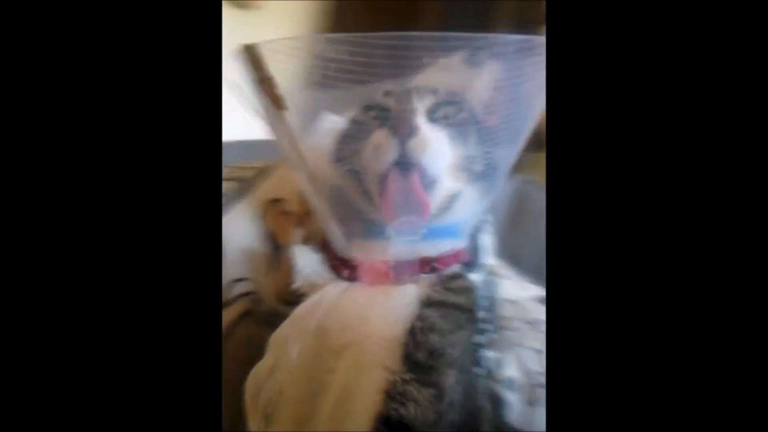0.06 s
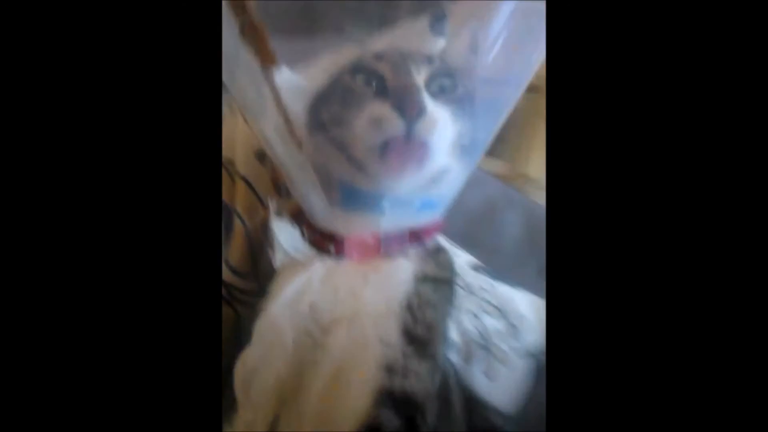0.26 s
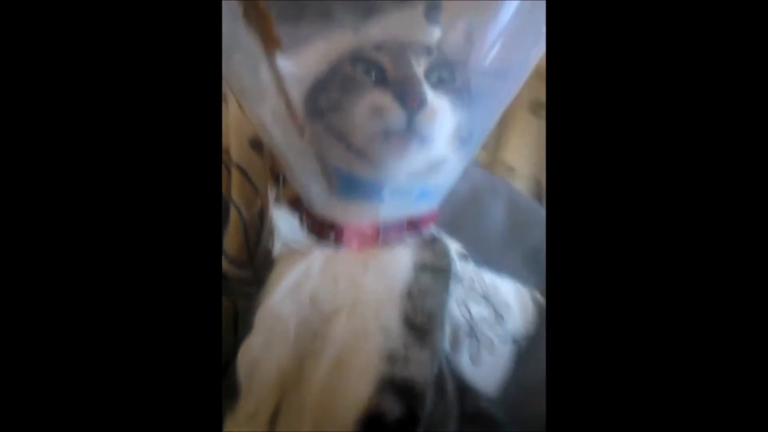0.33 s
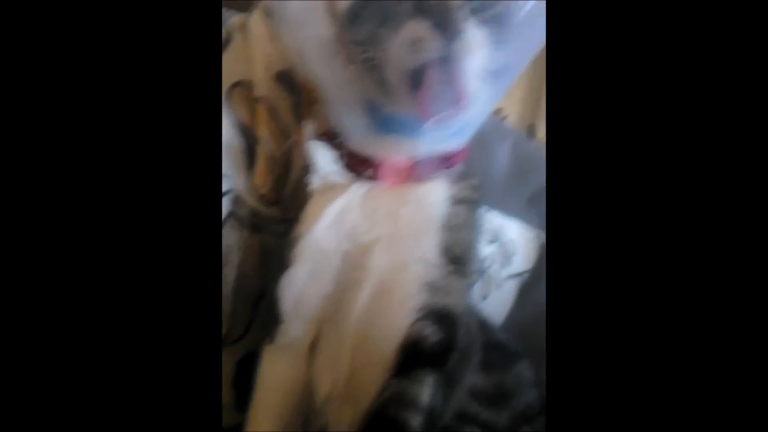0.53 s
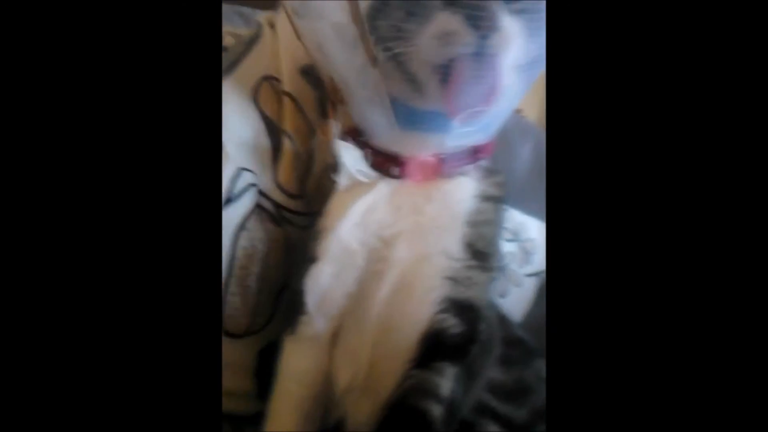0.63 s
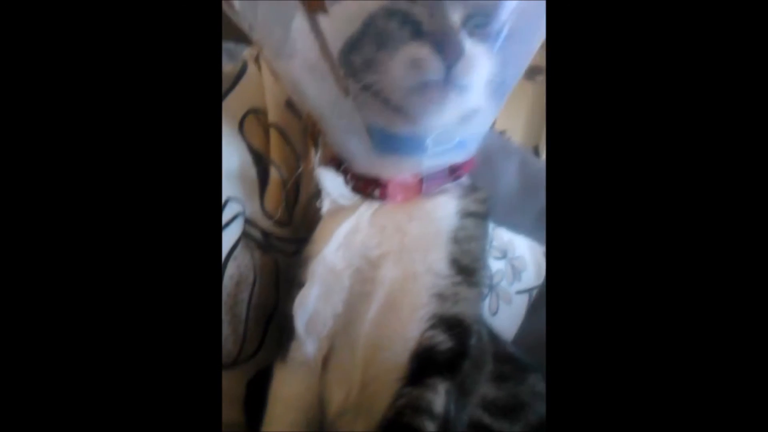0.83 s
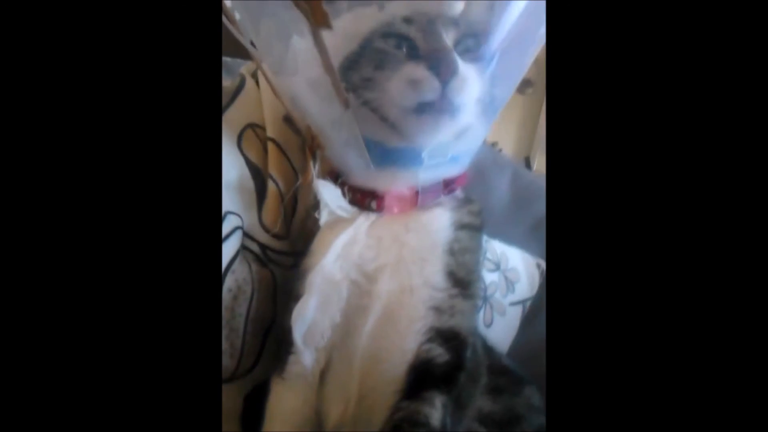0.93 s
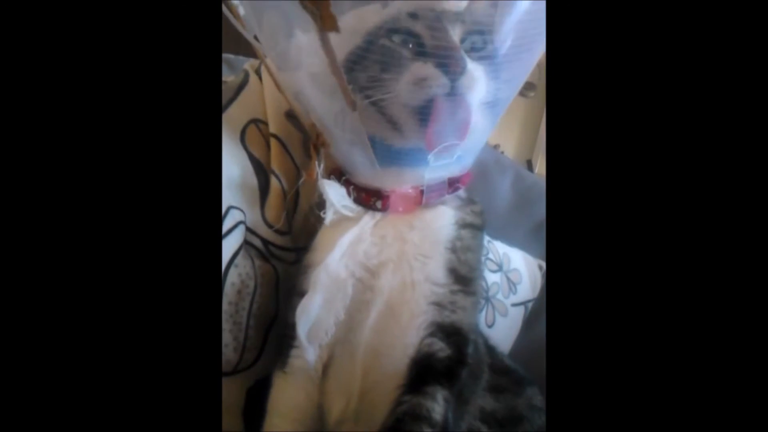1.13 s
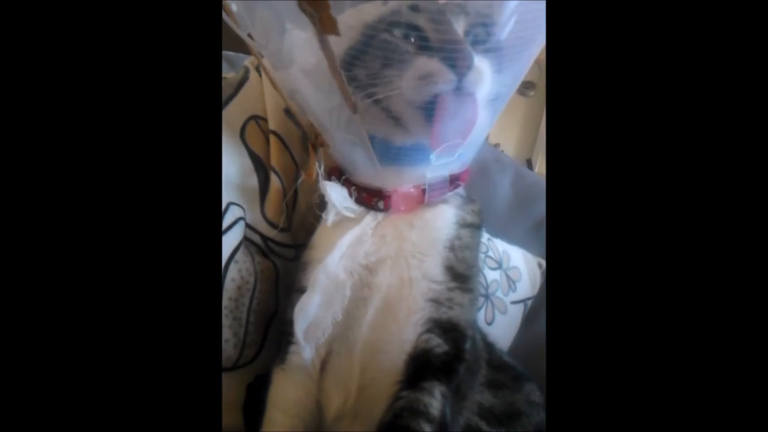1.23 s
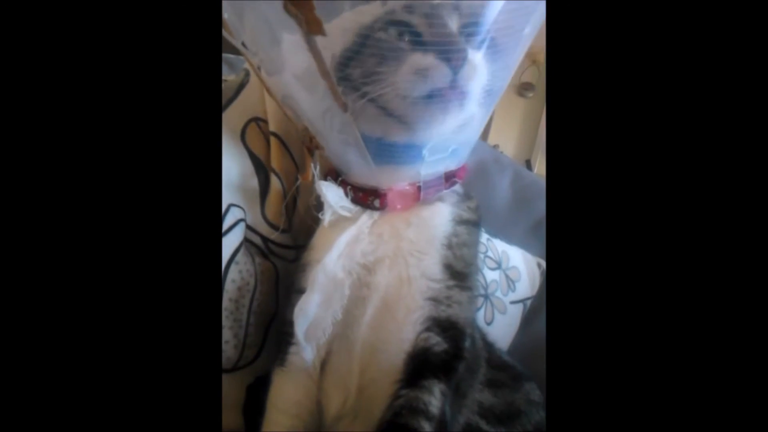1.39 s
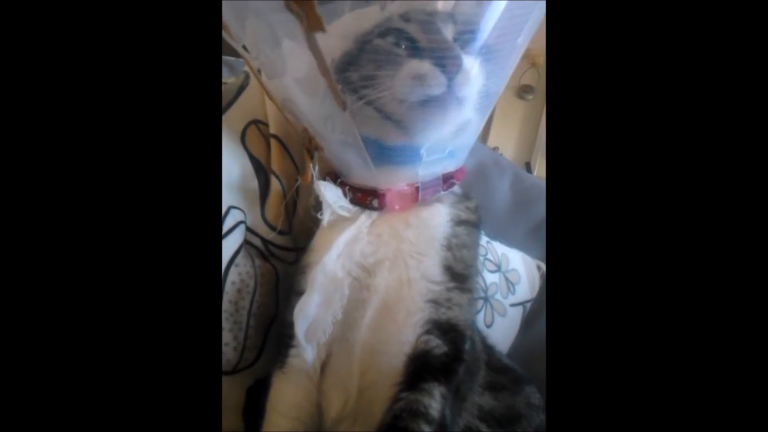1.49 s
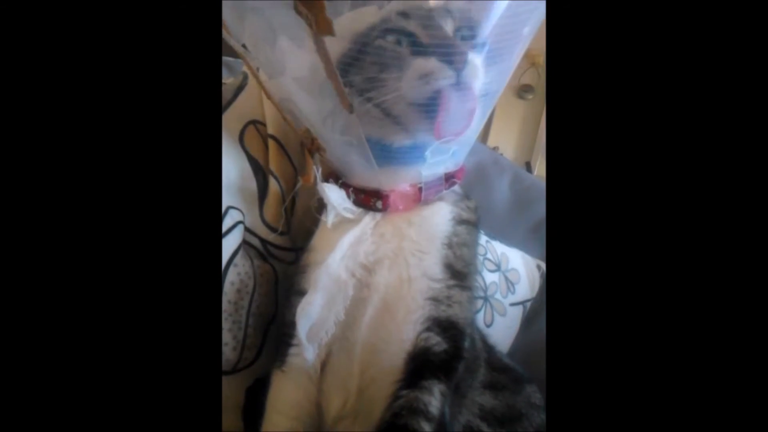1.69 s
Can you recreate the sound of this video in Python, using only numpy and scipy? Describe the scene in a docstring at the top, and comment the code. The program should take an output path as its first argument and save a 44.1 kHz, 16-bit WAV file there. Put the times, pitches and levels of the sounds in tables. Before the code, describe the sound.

A cat's rough tongue scrapes the inside of a plastic recovery cone three times. Each short rasp starts with small wet taps, and fur rustles faintly in between. The microphone is close, in a quiet small room.

```python
"""A quiet small room, one microphone close to a cat in a plastic recovery cone.
Room tone and a faint rustle of fur come first. At 0.2 s the tongue lands inside the cone with wet taps
and the sheet flexes; barbs catch and slip in a rasp that swells, turns briefly tonal and fades.
The cone rings briefly. Two more licks follow near 0.7 s and 1.3 s, with fur rustling in between
and once more at the end."""
import sys
import numpy as np
from scipy import signal
from scipy.fft import rfft, irfft
from scipy.io import wavfile

SR = 44100
rng = np.random.default_rng(int(sys.argv[2]) if len(sys.argv) > 2 else 0)


def file_out(sig):
    """Save sig as 16-bit WAV at sys.argv[1]."""
    # one column per channel
    cols = np.atleast_2d(sig).T
    # limit, then scale
    lim = np.clip(cols, -1, 1)
    pcm = np.round(lim * 32767).astype(np.int16)
    wavfile.write(sys.argv[1], SR, pcm)


N = 77175
TIME = np.arange(N) / SR


def amp(db):
    """Decibels to gain."""
    return 10 ** (np.asarray(db) / 20)


def unit(x):
    """Scales to rms 1."""
    return x / np.sqrt(np.mean(x ** 2) + 1e-20)


def bell(at, half_width_s):
    """A smooth rise and fall around a moment."""
    return np.exp(-((TIME - at) / half_width_s) ** 2)


def colour(x, points):
    """Minimum-phase filter through (frequency [Hz], level [dB]) points."""
    hz, db = np.transpose(points)
    f = abs(np.fft.fftfreq(4096, 1 / SR))
    log_gain = np.log(amp(np.interp(np.log(f + 1), np.log(hz + 1), db)))
    kernel = np.fft.ifft(np.exp(np.conj(signal.hilbert(log_gain)))).real
    return signal.fftconvolve(x, kernel[:len(f) // 2])[:N]


def cut(x, hz, kind):
    """Steep low-pass or high-pass."""
    return signal.sosfilt(signal.butter(6, hz, kind, fs=SR, output="sos"), x)


def resonate(x, hz, width_hz, passes=1):
    """One resonance; each further pass narrows it."""
    for _ in range(passes):
        x = signal.lfilter(*signal.iirpeak(hz, hz / width_hz, fs=SR), x)
    return x


def wander(hz):
    """Random drift up to a rate, rms 1."""
    slow = np.fft.rfftfreq(N, 1 / SR) < hz
    return unit(irfft(rfft(rng.standard_normal(N)) * slow, N))


# Spectrum of the quiet room at the microphone (frequency [Hz], relative level [dB])
ROOM_TONE_SPECTRUM = [(25, -12.5), (60, -10.5), (130, -20), (260, -21.5), (520, -17.5), (1000, -22),
                      (3000, -24.5), (5200, -25.5), (9300, -23.5), (14000, -26)]


def room_tone():
    """The steady bed of room air and microphone hiss."""
    return amp(-74) * unit(colour(rng.standard_normal(N), ROOM_TONE_SPECTRUM))


# Brushes of fur and whiskers (time [s], half-width [s], level [dB], centre [Hz], bandwidth [Hz])
FUR_RUSTLES = [(0.018, 0.046, -78, 220, 203), (.09, 0.24, -74, 64.4, 48.5), (0.137, 0.038, -74, 228, 139),
               (0.63, 0.028, -79.5, 102, 101), (1.035, 0.045, -74.5, 204, 158),
               (1.165, 0.21, -85, 466, 393), (1.181, 0.081, -76, 83.4, 99), (1.293, 0.045, -76, 7500, 7000),
               (1.706, 0.071, -75, 85.5, 100)]


def fur_rustle(at, half_width, db, hz, width_hz):
    """Hair brushes softly: a swell of band noise, faint even close up."""
    noise = resonate(rng.standard_normal(N), hz, width_hz, passes=2)
    return amp(db) * unit(noise) * bell(at, half_width)


def barbs(per_s=3000, spread_db=2, scatter_s=0.0025, scatter_db=3.5):
    """Tongue barbs let go of the plastic in tiny snaps, each scattering between the cone's walls."""
    size = amp(spread_db * np.minimum(rng.exponential(1, N), 4))
    snaps = size * rng.choice([-1., 1.], N) * (rng.random(N) < per_s / SR)
    retained = np.exp(-1 / (scatter_s * SR))
    energy = signal.lfilter([1 - retained], [1, -retained], snaps ** 2)
    scatter = np.sqrt(energy) * rng.standard_normal(N)
    return unit(snaps + amp(scatter_db) * scatter)


# Modes of the plastic cone (frequency [Hz], relative level [dB], time to fall 60 dB [s])
CONE_MODES = [(259.7, -11, 0.16), (549, 2, 0.068), (883, 7.5, 0.024), (1028, -1.5, 0.045), (1597, 4, 0.087),
              (1967, -9.5, 0.16)]


def cone_ring(force):
    """The cone's damped modes ring with whatever pushes the sheet."""
    ring = sum(amp(db - 60 * TIME / t60) * np.sin(2 * np.pi * hz * TIME) for hz, db, t60 in CONE_MODES)
    return signal.fftconvolve(force, ring / np.linalg.norm(ring))[:N]


# Tongue strokes; each rise and fall spans 10 dB (contact [s], hardest press [s], rise [s], fall [s],
# rasp level [dB], light drag [dB re press], body level [dB], body peak [s], body rise [s], body fall [s])
TONGUE_STROKES = [(0.21, 0.306, 0.056, 0.071, -40, -10, -48, 0.32, .072, 0.052),
                  (0.716, 0.8, 0.058, 0.059, -41, -16, -49, 0.7917, 0.054, 0.052),
                  (1.33, 1.43, 0.057, 0.051, -43, -19.5, -48.5, 1.409, 0.032, 0.051)]
# Rasp at the spot each lick reaches, one list a lick (frequency [Hz], relative level [dB])
RASP_SPECTRA = [
    [(1350, -36), (2300, -18), (2700, -16.5), (3040, -8), (3380, -14.5), (4080, -0.5), (4440, -4),
     (4720, -1.5), (5090, -2.5), (6240, -3), (7420, -3.5), (8310, 0.5), (9170, -4.5), (9960, -1),
     (11700, -9.5), (12300, -11.5), (14000, -14.5)],
    [(1350, -38), (2300, -14), (2660, -21), (3180, -13), (3490, -13), (3790, -5.5), (4080, -7), (4750, 2),
     (5240, -4), (5650, 1), (6480, 0), (8310, 3.5), (9740, 0.5), (10500, -2.5), (11600, -2), (12600, -12),
     (14000, -6.5)],
    [(1350, -47), (2300, -36), (2410, -12), (2680, -22), (2910, -13), (3280, -22), (3990, -9), (4610, -8.5),
     (5050, -6), (5650, -10.5), (7760, -2), (8190, -2), (8900, -7.5), (10700, -6), (14000, -18)],
]
# Hollow body of the cone, one list a lick (frequency [Hz], relative level [dB])
BODY_SPECTRA = [
    [(60, 1.5), (150, -14.5), (250, -1.5), (330, -9.5), (570, 0), (720, -3.5), (1020, 4), (1180, -7),
     (1350, 3), (1700, 0), (2100, 0), (2700, -12)],
    [(60, -4.5), (150, -31.5), (250, -5.5), (420, -15), (540, 0.5), (720, -8.5), (950, 3.5), (1250, -7),
     (1580, -1), (1850, -4), (2050, -4.5), (2700, -4)],
    [(25, -17), (80, 2.5), (150, -12), (250, 2), (430, -26), (560, -2), (700, -0.5), (1020, 4), (1190, -1),
     (1280, 7.5), (1650, -2), (2150, 2), (2700, -6.5)],
]


def lick(stroke, rasp_spectrum, body_spectrum, split_hz=2400):
    """The tongue drags lightly, presses and lifts; its barbs hiss and drive the hollow cone."""
    contact, peak, rise, fall, rasp_db, drag_db, body_db, body_peak, body_rise, body_fall = stroke
    settled = np.clip((TIME - contact) / 0.0035, 0, 1)  # the tongue settles on the plastic

    def pressure(at, up, down, least_db):
        t = TIME - at
        swell = amp(-10 * np.where(t < 0, abs(t / up) ** 2.24, abs(t / down) ** 2.13))
        drag = amp(least_db) * (t < 0)
        return np.maximum(swell, drag) * settled

    snaps = barbs()
    press = pressure(peak, rise, fall, drag_db)
    rasp = unit(cut(colour(snaps, rasp_spectrum), split_hz, "high")) * press
    # A lightly touching tongue gives a narrower hiss.
    narrow_hiss = unit(resonate(barbs(), hz=8830, width_hz=3200, passes=2))
    light_touch = amp(-14) * narrow_hiss * press ** 0.76
    clumps = unit(amp(2 * wander(hz=219)))  # rows of barbs let go together
    # A light drag drives the cone less than it hisses.
    push = pressure(body_peak, body_rise, body_fall, drag_db - 1.5) * clumps
    hollow = unit(cut(colour(snaps, body_spectrum), split_hz, "low")) * push
    ring = amp(-8) * cone_ring(barbs() * push)
    return amp(rasp_db) * (rasp + light_touch) + amp(body_db) * (hollow + ring)


# Bends of the whole cone (time [s], pitch [Hz], level [dB], rise [s], decay [s])
CONE_FLEXES = [(0.21, 52.3, -51.5, 0.013, 0.039), (.266, 246, -58, 0.0071, 0.01),
               (.315, 80.5, -58, 0.017, .014), (0.327, 245, -52.5, 0.011, 0.023),
               (.328, 572, -51.5, .012, 0.0071), (0.774, 64.8, -67, 0.012, 0.057),
               (1.402, 83, -59.5, 0.0041, 0.018), (1.46, 147, -58.5, 0.007, 0.012)]


def cone_flex(start, hz, db, rise, decay):
    """A low bending mode of the cone, pushed up and left to die."""
    t = np.maximum(TIME - start, 0)
    envelope = np.minimum(t / rise, 1) * np.exp(-np.maximum(t - rise, 0) / decay)
    return -amp(db) * envelope * np.sin(2 * np.pi * hz * t)


# Landings and slips of the tongue
# (time [s], tick level [dB], tick decay [s], knock level [dB], knock pitch [Hz], knock decay [s])
TONGUE_TAPS = [(.211, -51, .012, -58, 847, 0.014), (0.22, -54, 0.0087, -44.5, 1590, 0.004),
               (0.316, -36.5, 0.0023, -56, 1490, 0.0034), (.680, -57, 0.035, -61.5, 533, 0.013),
               (.688, -45, 0.0023, -66, 875, 0.022), (.714, -43, .005, -49, 592, 0.01),
               (.740, -41.5, .004, -59, 1007, 0.025), (1.333, -55, 0.0055, -79, 1600, .007),
               (1.35, -47.5, 0.0058, -58, 1290, 0.0039), (1.381, -46, 0.0058, -50, 1230, 0.0044),
               (1.400, -46, 0.0046, -36, 1596, 0.0028), (1.417, -38, 0.0017, -48, 1023, 0.0069)]
# The wet tick, heard close (frequency [Hz], relative level [dB])
TICK_SPECTRUM = [(200, -19), (2000, -3), (3200, -22), (4800, 11.5), (7000, 0), (9500, 7.5), (12000, 5.5),
                 (14000, 3.5)]


def tongue_tap(start, tick_db, tick_decay, knock_db, hz, knock_decay, rise_s=0.0012):
    """The tongue lands or slips: a quick burst of snaps with a short hollow knock."""
    t = np.maximum(TIME - start, 0)
    tick = amp(tick_db) * np.exp(-t / tick_decay) * unit(colour(barbs(), TICK_SPECTRUM))
    knock = amp(knock_db) * np.exp(-t / knock_decay) * np.sin(2 * np.pi * hz * t)
    return np.minimum(t / rise_s, 1) * (tick + knock)


def echoes(x, t60_s):
    """Dense dying reflections of about the same energy as the input."""
    tail = rng.standard_normal(N) * amp(-60 * TIME / t60_s)
    return signal.fftconvolve(x, tail / np.linalg.norm(tail))[:N]


# Tonal moments in the rasp (time [s], half-width [s], level [dB], dip or lift of the lick [dB])
RASP_ZINGS = [(0.291, 0.016, -40, -7), (0.702, 0.018, -60, 11), (0.763, 0.012, -46, -8)]
# Their tones, one list a zing (frequency [Hz], relative level [dB])
ZING_PARTIALS = [
    [(1020, -4), (1360, -4), (1650, -2.5), (4200, -2), (4800, 1.5), (6150, 1), (6480, -1.5), (8250, 1),
     (8620, -0.5), (9680, 2.5), (11300, -4)],
    [(1950, -7), (4950, -7), (5600, -4.5), (8600, -7), (9200, 0), (11900, -2.5)],
    [(990, -1.5), (1570, -8), (1970, -5.5), (5000, -3.5), (5640, 1), (6950, 0), (8540, -5), (9350, -0.5),
     (10930, -4), (12020, -6)],
]


def zing(row, partials, waver_hz=43.7):
    """A few wavering tones swell and vanish within the rasp."""
    at, half_width, db, _ = row
    tones = np.zeros(N)
    for hz, partial_db in partials:
        pitch = hz + waver_hz * wander(hz=219)
        tones += amp(partial_db) * np.sin(2 * np.pi * np.cumsum(pitch) / SR)
    return amp(db) * unit(tones) * bell(at, half_width)


def scene():
    """Mono, close to the cone, with the small soft room well behind it."""
    fur = sum(fur_rustle(*row) for row in FUR_RUSTLES)
    licks = sum(lick(*parts) for parts in zip(TONGUE_STROKES, RASP_SPECTRA, BODY_SPECTRA))
    flexes = sum(cone_flex(*row) for row in CONE_FLEXES)
    taps = sum(tongue_tap(*row) for row in TONGUE_TAPS)
    zings = sum(zing(*parts) for parts in zip(RASP_ZINGS, ZING_PARTIALS))
    lick_change_db = sum(db * bell(at, half_width) for at, half_width, _, db in RASP_ZINGS)
    cone = amp(lick_change_db) * licks + taps + zings
    room = amp(-21.5) * echoes(cone, t60_s=0.18)
    # A faint high ring lingers after each lick.
    high_ring = amp(-24) * resonate(echoes(cone, t60_s=0.9), hz=8450, width_hz=4200)
    return (room_tone() + fur + flexes + cone + room + high_ring)[None]


def record(dry, edge_hz=14230):
    """The recorder behind the microphone cuts off the highest treble."""
    low_pass = signal.firwin(601, edge_hz, window=("kaiser", 7), fs=SR)
    return signal.oaconvolve(dry, low_pass[None], "same")


dry = scene()
out = record(dry)
file_out(out)
```